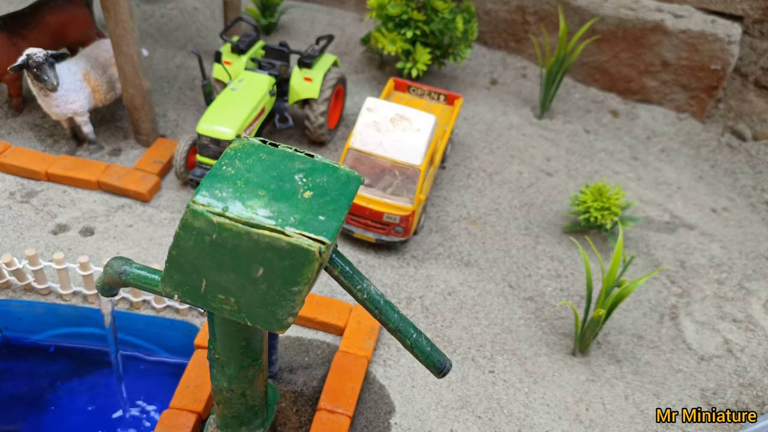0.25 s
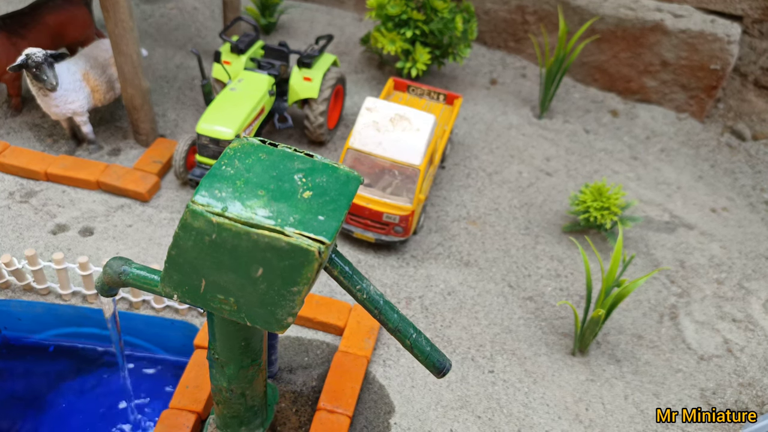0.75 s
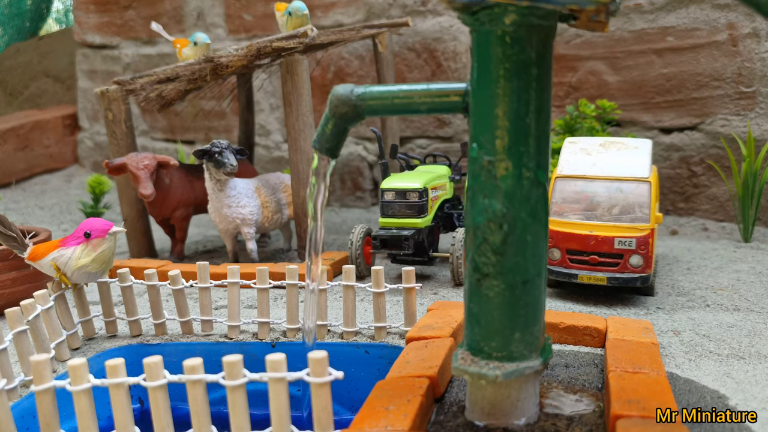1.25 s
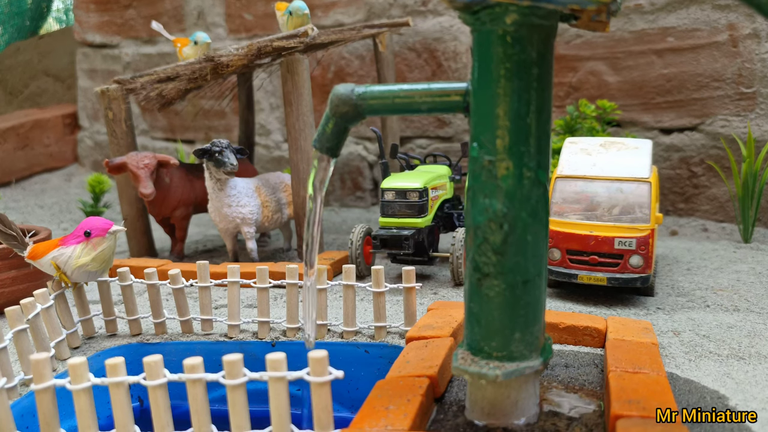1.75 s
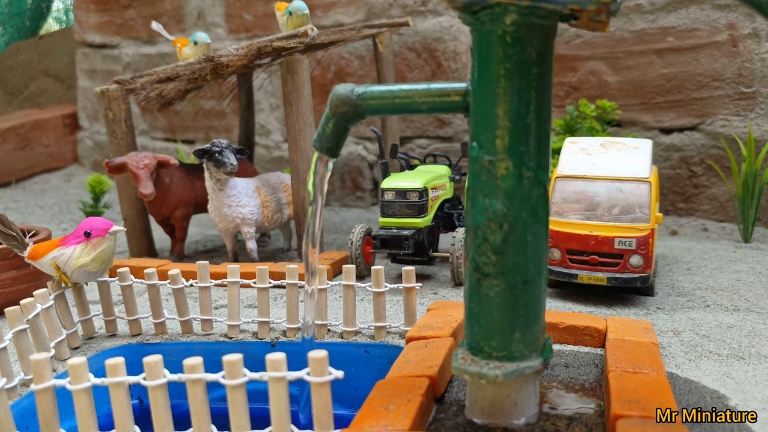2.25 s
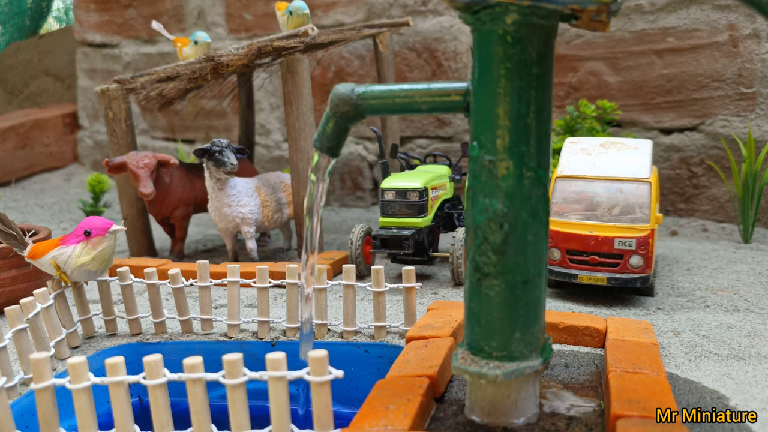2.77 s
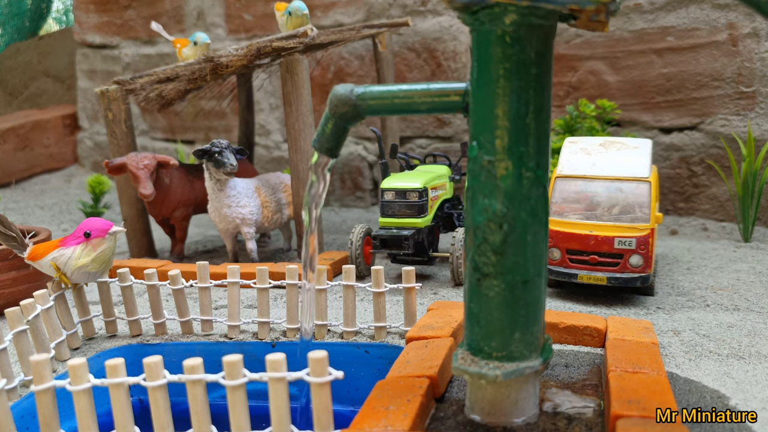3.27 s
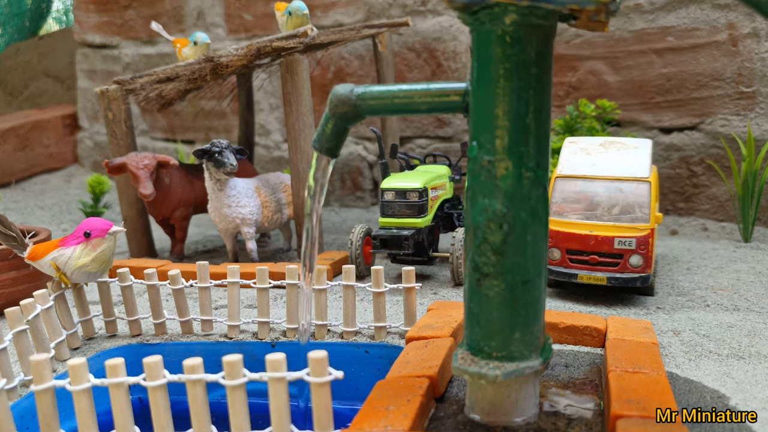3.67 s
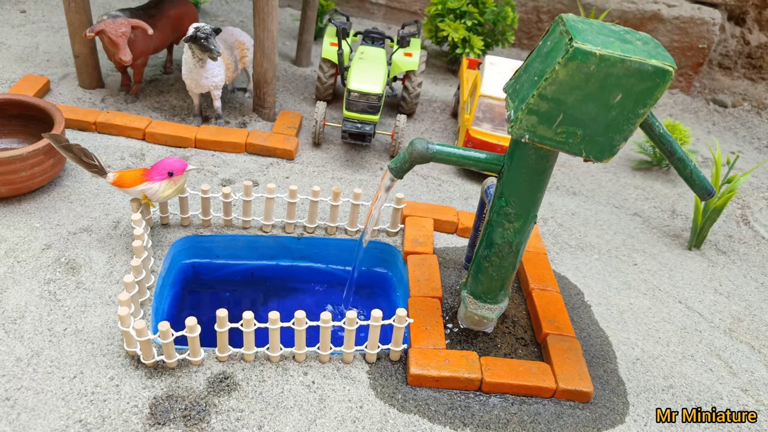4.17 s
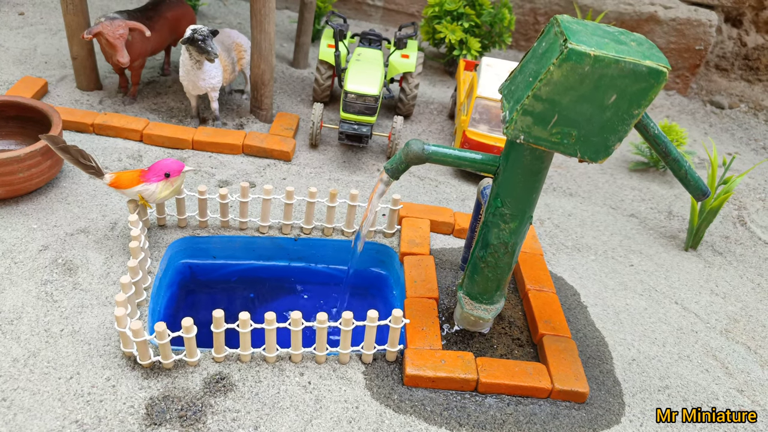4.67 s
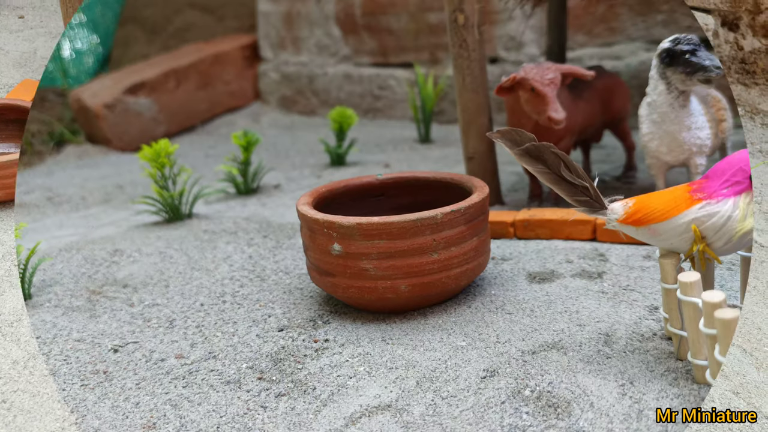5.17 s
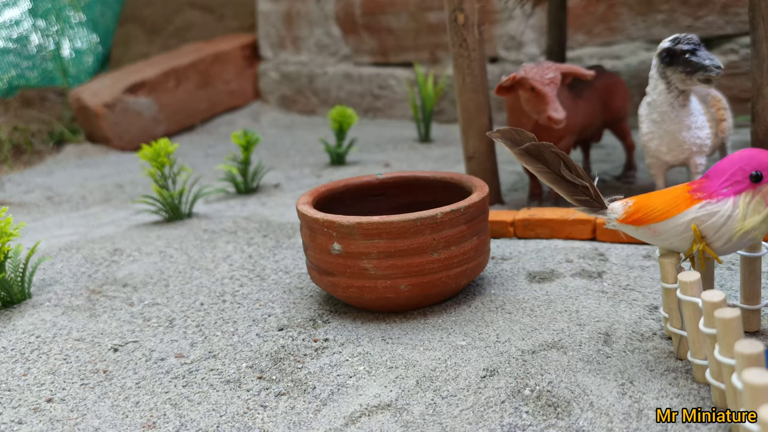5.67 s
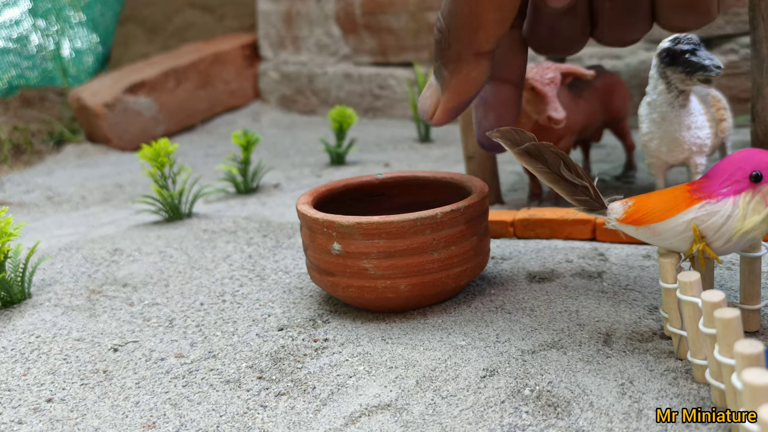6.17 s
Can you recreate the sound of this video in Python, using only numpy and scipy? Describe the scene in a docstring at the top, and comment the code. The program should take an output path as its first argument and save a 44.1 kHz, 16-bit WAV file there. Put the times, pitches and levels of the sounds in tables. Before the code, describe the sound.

From 0 to about 6.4 seconds a thin stream of water runs continuously into a small plastic tub, close to a phone microphone outdoors. It is a light, bright, uneven trickle: many short slaps of a cycle or two, mostly mid-pitched, mixed with tiny bubbles that often chirp upward, plinks, ticks and fine fizz. Stronger plips stand out near 0.5, 1.2 to 1.5, 1.8, 2.2, 3.5, 4.3 and 4.6 seconds; momentary lulls fall near 1.0, 2.2, 3.1, 4.5, 4.9 and 6.3. The tub adds very short, scattered reflections, with hardly any tail from the open yard. Far away a high, rasping insect chirps about four times a second, very faint, with slightly wider gaps around 5 seconds. Beneath lie quiet air and low, lumpy rumble, swelling faintly near 0.2, 1.25, 2.1, 2.75 and 5.75 seconds, with soft bumps near 0.1 and 2.6.

```python
"""Thin stream into a plastic tub, outdoors

A thin stream from a toy pump falls into a small plastic tub of water, close to a phone.
Dents in the surface close with a slap, damped rings of a cycle or two; trapped air rings as bubbles,
most rising in pitch. Clumped tiny rings and shaped noise fill the gaps. An insect, perhaps a cricket,
chirps far off as gated noise, over quiet air and a low lumpy noise rumble with a few soft bumps."""
import sys
import numpy as np
from scipy import signal
from scipy.io import wavfile

SR = 44100
rng = np.random.default_rng(int(sys.argv[2]) if len(sys.argv) > 2 else 0)


def int16_out(signal):
    """Quantize to a 16-bit WAV file."""
    q = np.round(np.clip(np.atleast_2d(signal).T, -1, 1) * 32767)
    wavfile.write(sys.argv[1], SR, q.astype(np.int16))


N = 283077
TIME = np.arange(N) / SR
LEAD_SAMPLES = 200  # part of each ring ahead of its nominal time, where it swells

# dents in the surface, snapping shut: [t/s, relative level/dB, f/Hz, swell/cycles]
SLAPS = [(0.026, -13.5, 610, 0.041), (0.0445, -10.5, 870, 0.1), (0.126, -21.5, 365.0, 0.083),
         (0.1599, -16.5, 930, 0.014), (0.2349, -15, 920, 0.013), (0.2616, -19, 382, 0.061),
         (0.267, -11, 2570, 1.5), (0.3491, -20, 675, 0.037), (0.3704, -20, 3700, 0.14),
         (0.3858, -8, 805, 0.11), (0.4122, -13.5, 1670, 0.38), (0.4167, -14.5, 1220, 0.095),
         (0.483, -16, 1530.0, 0.024), (0.502, -2.5, 1210, 0.065), (0.5163, -28, 590.0, 0.046),
         (0.5584, -17.5, 980, 0.041), (0.6151, -9.5, 1730, 0.063), (0.6363, -10.5, 710, 0.023),
         (0.6464, -24, 1600.0, 0.041), (0.665, -23, 1910.0, 0.056), (0.6693, -12.5, 2190, 0.095),
         (0.6997, -13, 2200, 0.066), (0.727, -13.5, 770, 0.082), (0.8045, -16.5, 785, 0.02),
         (0.808, -20.5, 1350.0, 0.033), (0.8388, -12.5, 1270, 0.01), (0.8867, -25.5, 740, 0.1),
         (0.9191, -15, 880, 0.011), (1.0973, -11.5, 3040, 0.046), (1.1069, -18, 1410.0, 0.041),
         (1.13, -12.5, 740, 0.034), (1.1506, -6, 980, 0.071), (1.165, -17, 1800.0, 0.034),
         (1.2103, -20.5, 3900, 0.041), (1.245, -10, 714, 0.081), (1.2697, -16, 757.0, 0.12),
         (1.2828, -6, 1770, 0.38), (1.305, -16, 1640.0, 0.022), (1.361, -6, 880, 0.046),
         (1.369, -27, 1770.0, 0.23), (1.4207, -11.5, 1190, 0.11), (1.4385, -21, 784.0, 0.051),
         (1.4774, -12.5, 890, 0.069), (1.5006, -5.5, 1760.0, 0.049), (1.5031, -16, 1300, 0.041),
         (1.5114, -7.5, 3150, 0.18), (1.5357, -11, 1260, 0.042), (1.5575, -14.5, 2690, 3.2),
         (1.5726, -19.5, 1430.0, 0.046), (1.5863, -17.5, 704, 0.086), (1.6212, -21, 2080, 0.02),
         (1.697, -16, 750, 0.045), (1.7285, -22, 1820.0, 0.041), (1.7777, -5, 1420, 0.085),
         (1.8196, -30, 2740.0, 0.29), (1.8685, -15.5, 2420.0, 0.027), (1.876, -6.5, 814.0, 0.11),
         (1.8913, -27, 2660.0, 0.04), (1.8952, -12, 863.0, 0.034), (1.9225, -18.5, 980, 0.032),
         (1.9563, -16, 870, 0.029), (1.9948, -9, 3460, 0.19), (2.0152, -11.0, 574, 0.058),
         (2.023, -13.5, 1920, 0.44), (2.0961, -22.5, 940, 0.27), (2.158, -3.5, 2500, 0.51),
         (2.1985, -13, 2090.0, 0.05), (2.3041, -19.5, 1540.0, 0.057), (2.344, -6, 1890.0, 0.78),
         (2.3729, -19, 608.0, 0.061), (2.46, -14, 2740, 0.3), (2.461, -16, 504, 0.13),
         (2.4649, -16, 3610.0, 0.13), (2.572, -15, 3730, 0.055), (2.5962, -6.0, 584, 0.041),
         (2.6536, -27, 739.0, 0.041), (2.675, -21.5, 385, 0.15), (2.6868, -26, 365.0, 0.099),
         (2.7372, -13.5, 680, 0.048), (2.8311, -9, 980, 0.062), (2.9054, -18.5, 730, 0.041),
         (2.925, -7, 3160, 0.89), (2.942, -7.5, 655, 0.053), (2.9915, -18.5, 1010.0, 0.024),
         (3.0252, -7, 1690, 0.015), (3.0321, -15, 848.0, 0.06), (3.1322, -24.5, 448.0, 0.041),
         (3.1594, -26, 1500.0, 0.036), (3.1756, -18.5, 380, 0.053), (3.196, -9, 1140, 0.03),
         (3.2088, -26, 402.0, 0.056), (3.2269, -9.5, 1810, 0.028), (3.2787, -19.5, 520, 0.11),
         (3.2866, -23, 536.0, 0.041), (3.3273, -17, 1670, 0.033), (3.3391, -12, 1460, 0.33),
         (3.3508, -17, 1800, 1.1), (3.3703, -10, 1370, 0.074), (3.4516, -25, 902.0, 0.041),
         (3.483, -11.5, 754, 0.037), (3.5217, -5, 1590, 0.27), (3.5473, -11, 3300, 0.51),
         (3.5865, -23, 1310.0, 0.038), (3.6433, -22.5, 1030.0, 0.095), (3.7201, -12.5, 990, 0.012),
         (3.731, -22, 572.0, 0.041), (3.754, -7.5, 550, 0.035), (3.7794, -22, 1550.0, 0.078),
         (3.7883, -22, 1500.0, 0.037), (3.8008, -15, 1020, 0.026), (3.8324, -19, 1200.0, 0.043),
         (3.845, -12, 810, 0.29), (3.8557, -19, 1630, 0.041), (3.871, -6.5, 2900, 0.042),
         (3.9025, -6.5, 2960, 0.062), (3.9538, -11.5, 2270, 0.083), (3.9825, -15, 605, 0.041),
         (4.0843, -17, 1270, 0.041), (4.16, -17, 546.0, 0.035), (4.1906, -22, 1850.0, 0.045),
         (4.213, -9, 900, 0.041), (4.2363, -20, 968.0, 0.042), (4.2435, -14.5, 1300, 0.037),
         (4.2686, -11.5, 1450, 0.034), (4.2926, -4, 2430, 0.33), (4.3066, -16, 1870.0, 0.041),
         (4.3276, -9.5, 573, 0.041), (4.3548, -21, 2570.0, 0.11), (4.364, -25, 1370.0, 0.041),
         (4.3775, -16.5, 662.0, 0.09), (4.447, -11, 1130, 0.019), (4.5421, -14.5, 1370, 0.07),
         (4.5646, -3.5, 1120, 0.035), (4.5992, -5, 2460, 2.4), (4.7368, -25, 768.0, 0.053),
         (4.7661, -10, 845, 0.036), (4.7744, -19, 1560.0, 0.18), (4.829, -10.5, 830, 0.031),
         (4.8632, -16.5, 1100, 0.024), (5.008, -23.5, 977.0, 0.041), (5.0554, -15.5, 696, 0.055),
         (5.0712, -18.5, 2450.0, 0.72), (5.0911, -13, 1700, 0.05), (5.1018, -8.5, 2700, 0.045),
         (5.1185, -13, 734, 0.041), (5.1293, -8.5, 1700, 0.13), (5.149, -10, 1710, 0.11),
         (5.1969, -18.5, 1070, 0.017), (5.225, -8.5, 3350, 0.3), (5.2343, -15.5, 1810, 0.063),
         (5.2515, -19.5, 481.0, 0.055), (5.3319, -9, 2880, 2.2), (5.3498, -12.5, 1040, 0.014),
         (5.3876, -30, 1840.0, 0.037), (5.417, -20.5, 1540, 0.029), (5.4482, -16.0, 1210, 0.076),
         (5.468, -21, 1290.0, 0.11), (5.506, -18, 2210, 0.036), (5.561, -15.5, 613, 0.027),
         (5.5921, -20, 596, 0.085), (5.614, -11, 3140, 0.069), (5.6217, -14, 1160.0, 0.041),
         (5.6404, -24, 771.0, 0.076), (5.7165, -16.5, 780, 0.13), (5.723, -18.5, 660, 0.051),
         (5.735, -29, 1330, 0.1), (5.8084, -11.5, 670, 0.015), (5.8328, -14.5, 665, 0.19),
         (5.8378, -27, 2060.0, 0.042), (5.864, -19.5, 694, 0.036), (5.8977, -18.5, 1880, 0.037),
         (5.979, -20, 1700.0, 0.13), (5.9833, -18.5, 1400, 0.042), (5.987, -14, 860, 0.028),
         (6.0443, -15, 530, 0.027), (6.0884, -17, 1670, 0.043), (6.095, -23, 2110, 0.2),
         (6.1175, -7.5, 2950, 0.097), (6.1452, -7, 695, 0.29), (6.191, -21.5, 806.0, 0.047),
         (6.2436, -20, 1340, 0.022), (6.361, -20.5, 4100.0, 0.048), (6.364, -12, 1610, 0.81),
         (6.385, -10.5, 700, 0.04)]
# air bubbles: [t/s, relative level/dB, starting f/Hz, swell/cycles, t60/s, climb/(share of f per s)]
BUBBLES = [(0.0034, -19, 1230, 0.2, 0.003, 0), (0.0039, -21.5, 6450, 0.07, 0.0012, 167),
           (0.014, -18.5, 3120, 0.11, 0.0011, 250), (0.0355, -28, 1890, 0.05, 0.011, 158),
           (0.08, -10.5, 4500, 0.24, 0.002, 2), (0.103, -10.5, 5950, 1.2, 0.00095, 0),
           (0.126, -11, 6800, 1.1, 0.0033, -5), (0.157, -33.5, 2290, 2, 0.023, 194),
           (0.22, -31, 1690, 0.84, 0.013, 31), (0.2695, -31.5, 3790.0, 0.041, 0.013, 51),
           (0.295, -19, 2670, 0.041, 0.00097, 250), (0.3015, -21, 5700, 0.29, 0.0032, 106),
           (0.3076, -27, 7060, 0.052, 0.0027, 245), (0.3191, -20, 3130, 0.1, 0.0047, 3),
           (0.33, -26, 5580.0, 0.11, 0.0049, 55), (0.3553, -30, 3230.0, 0.053, 0.0027, 7),
           (0.3897, -19.5, 1420, 2.1, 0.013, 179), (0.4083, -22, 2400.0, 0.36, 0.0028, 252),
           (0.536, -24.5, 3420.0, 0.042, 0.0031, 4), (0.6, -23, 946.0, 0.38, 0.0091, 235),
           (0.6003, -14, 5300, 0.44, 0.0019, 253), (0.6158, -25, 6800, 0.059, 0.0034, 75),
           (0.759, -26, 5380.0, 0.41, 0.0033, -19), (0.8218, -38, 1770, 2.2, 0.012, 240),
           (0.8675, -26.5, 3240, 2, 0.002, 0), (0.8756, -19, 5800, 0.052, 0.0013, 229),
           (0.9007, -22, 4480, 0.042, 0.002, 238), (0.9354, -30, 7100, 3, 0.0045, 50),
           (0.9805, -37, 3440, 0.5, 0.0071, 200), (1.0042, -31.5, 1410, 0.091, 0.007, 240),
           (1.0675, -20.0, 1426, 0.049, 0.018, 237), (1.2142, -33, 5150, 0.2, 0.0052, 200),
           (1.2556, -29, 6200, 0.042, 0.0054, 45), (1.3038, -14.5, 2920, 0.4, 0.0013, 254),
           (1.3552, -28, 4540, 0.08, 0.0044, 41), (1.395, -30, 1670, 0.23, 0.012, 63),
           (1.3965, -20.5, 7360, 0.38, 0.00081, 21), (1.4302, -18, 2440.0, 0.29, 0.0045, 261),
           (1.4587, -21, 3450, 0.14, 0.0054, 244), (1.5357, -15.5, 1210, 0.81, 0.0093, 61),
           (1.6002, -24.5, 835, 0.1, 0.024, 103), (1.6155, -31, 2190, 2, 0.004, 242),
           (1.6336, -31.5, 3680, 0.4, 0.004, 120), (1.655, -34, 3760, 2, 0.002, 120),
           (1.7207, -28, 3800, 0.17, 0.0028, 242), (1.724, -34.5, 5550, 1, 0.014, 69),
           (1.7498, -12.5, 1620, 0.22, 0.011, 145), (1.818, -36, 2280, 0.5, 0.022, 100),
           (1.9007, -31, 2050, 0.041, 0.014, 80), (1.9762, -24.5, 2820, 0.078, 0.0079, 127),
           (2.0426, -25.5, 1470, 1.6, 0.011, 139), (2.056, -30, 1540.0, 0.23, 0.01, 263),
           (2.1373, -23, 2750, 0.041, 0.0044, 131), (2.139, -19.5, 5470, 0.048, 0.0044, 208),
           (2.1543, -33, 2950, 0.3, 0.009, 180), (2.199, -22.5, 5970, 0.22, 0.0037, 52),
           (2.2266, -17, 7400, 0.76, 0.00055, 252), (2.2526, -22, 5190, 1.7, 0.0012, 120),
           (2.2736, -7, 4570, 0.28, 0.00097, 213), (2.301, -31, 7460, 1.4, 0.0031, 27),
           (2.3313, -14.0, 1340, 0.042, 0.01, 251), (2.3387, -14, 810, 0.053, 0.0096, 260),
           (2.345, -16.5, 3230, 2.9, 0.0047, 144), (2.3655, -7.5, 4270, 0.041, 0.00058, 235),
           (2.4237, -35, 2960, 0.5, 0.0087, 202), (2.427, -13.5, 4770, 0.041, 0.00093, 240),
           (2.436, -35, 3940, 0.59, 0.0051, 56), (2.4688, -37, 2030, 0.3, 0.007, 52),
           (2.5374, -34, 3250, 0.041, 0.024, 69), (2.541, -12, 3320, 0.076, 0.0014, 66),
           (2.543, -24.5, 5700, 0.046, 0.0052, 59), (2.6127, -40, 1940, 2, 0.017, 122),
           (2.619, -22.5, 3170, 0.64, 0.018, 136), (2.6974, -35, 1150, 0.11, 0.046, 54),
           (2.6973, -29.5, 3340, 0.042, 0.0081, 190), (2.7154, -24.5, 3720, 0.18, 0.0016, 242),
           (2.7673, -33.5, 3080, 1, 0.0095, 104), (2.8876, -28.5, 5930, 0.59, 0.003, 200),
           (2.92, -20.5, 3160, 0.043, 0.011, 93), (2.9687, -20.5, 5150, 0.31, 0.0051, 159),
           (2.9824, -33, 7600, 2, 0.0037, 0), (3.0114, -31, 2960, 0.057, 0.0059, 101),
           (3.0398, -25, 2260, 0.041, 0.004, 246), (3.0878, -16, 3550.0, 0.047, 0.00081, 249),
           (3.09, -25, 5700, 0.049, 0.01, 254), (3.1086, -34, 1860, 0.3, 0.011, 122),
           (3.1108, -32, 2570, 0.041, 0.011, 179), (3.1374, -36, 2670, 2, 0.014, 50),
           (3.2312, -20.5, 770, 0.038, 0.0089, 262), (3.249, -24, 1026, 0.041, 0.045, 105),
           (3.2569, -21, 3320, 0.29, 0.005, 258), (3.2684, -20, 4530, 0.11, 0.0017, 71),
           (3.3212, -23.5, 5260.0, 0.63, 0.0051, 18), (3.3423, -26, 4400, 0.043, 0.0038, 210),
           (3.3839, -30, 1060, 0.041, 0.015, 128), (3.3871, -19.5, 2820, 0.33, 0.0064, 232),
           (3.4043, -34, 1280, 2.4, 0.016, 183), (3.432, -23, 3380, 0.13, 0.0028, 22),
           (3.4624, -23, 2950, 0.045, 0.003, 90), (3.4777, -36, 7640, 0.3, 0.0054, 3),
           (3.523, -16, 1180, 1, 0.012, 24), (3.5426, -25.0, 2740, 0.043, 0.0034, 240),
           (3.6753, -37, 4520, 0.3, 0.0099, 50), (3.737, -26.5, 3260, 0.041, 0.0054, 207),
           (3.7394, -30, 6650, 0.049, 0.0028, 118), (3.7906, -21.5, 5960, 0.1, 0.0027, 248),
           (3.8287, -16, 7900, 0.11, 0.0018, 4), (3.8433, -27.5, 3270, 2.2, 0.0076, 154),
           (3.8462, -26.5, 4290.0, 0.17, 0.0065, 254), (3.8754, -22, 5450.0, 1, 0.0016, 47),
           (3.899, -18, 5200, 0.53, 0.0039, 139), (3.9321, -39, 1680, 2, 0.012, 52),
           (3.953, -19.5, 7050, 1.2, 0.0014, 8), (3.9584, -11, 1050.0, 0.041, 0.0011, 6),
           (3.977, -33, 3250, 0.092, 0.0087, 83), (3.988, -21.5, 1750, 0.097, 0.015, 265),
           (4.066, -13, 2300, 0.041, 0.002, 254), (4.0717, -9, 4250, 0.67, 0.001, 0),
           (4.0799, -12, 6730, 0.058, 0.00073, 230), (4.1374, -27.5, 6130, 2, 0.0017, 2),
           (4.161, -25, 6870, 0.31, 0.00093, 6), (4.1894, -14, 1670, 0.06, 0.0075, 100),
           (4.1909, -16, 2700, 0.34, 0.008, 155), (4.21, -28.5, 3390.0, 0.24, 0.015, -6),
           (4.2346, -30, 2080, 0.3, 0.007, 0), (4.2634, -28, 1770, 2.2, 0.022, 48),
           (4.2922, -17, 3170, 0.11, 0.01, 117), (4.303, -25, 6060.0, 0.047, 0.0014, 57),
           (4.3134, -27, 4060, 0.097, 0.004, -1), (4.3348, -35, 2630, 0.1, 0.011, 191),
           (4.3583, -5, 4330, 0.2, 0.0009, -14), (4.4094, -29, 4550, 2, 0.0018, 240),
           (4.4192, -31.5, 756, 0.041, 0.022, 233), (4.477, -15.5, 4100, 0.1, 0.0083, -13),
           (4.496, -21, 5500, 0.043, 0.002, -3), (4.565, -21.5, 7440, 0.058, 0.0034, 22),
           (4.5737, -27, 3030, 0.061, 0.0036, -1), (4.5994, -16.5, 2820, 0.042, 0.011, 76),
           (4.6153, -29, 2420, 2, 0.016, 200), (4.6177, -14, 3980.0, 0.1, 0.0011, 0),
           (4.662, -28, 1800, 0.18, 0.011, 240), (4.6658, -11.5, 4100, 0.059, 0.0016, 0),
           (4.6876, -5, 4450, 0.39, 0.0012, 3), (4.7161, -18.5, 2980, 0.057, 0.0037, 62),
           (4.7741, -18, 3790, 0.74, 0.0048, 109), (4.803, -13, 745, 0.1, 0.004, 84),
           (4.809, -20.5, 975, 0.13, 0.0052, 240), (4.8094, -26.5, 6050.0, 0.047, 0.0031, 126),
           (4.8383, -22.5, 2910, 0.044, 0.013, 134), (4.9315, -12.5, 4160, 2.5, 0.0019, 168),
           (4.9548, -34, 3200, 0.13, 0.012, 99), (4.99, -19.5, 5470, 0.4, 0.00097, 43),
           (5.0267, -20.5, 3520, 0.074, 0.0053, 0), (5.092, -22.5, 7250, 0.042, 0.0038, 6),
           (5.1024, -15.5, 6760, 1.2, 0.0019, 37), (5.1607, -21, 3520, 0.041, 0.0054, 252),
           (5.1792, -35, 1330.0, 0.044, 0.012, 106), (5.2292, -28, 3190.0, 0.042, 0.0078, 120),
           (5.2514, -23.5, 4050, 0.13, 0.0034, -8), (5.2646, -32.5, 1350, 0.041, 0.011, 39),
           (5.282, -31, 5300, 0.21, 0.0061, 211), (5.2935, -24, 4800, 0.067, 0.0017, 247),
           (5.3763, -17.5, 686, 0.03, 0.0023, -6), (5.4047, -19, 5000, 0.28, 0.0049, 114),
           (5.4104, -15, 6070, 0.22, 0.0011, 0), (5.4712, -25.5, 1070, 0.041, 0.013, 93),
           (5.4995, -22, 4940, 0.048, 0.0024, 65), (5.5416, -17, 7400, 0.55, 0.00069, 47),
           (5.5478, -22.5, 2230, 0.041, 0.0043, 253), (5.5772, -34, 404, 0.2, 0.015, 0),
           (5.6008, -34, 1600.0, 1.3, 0.016, 28), (5.6014, -22.5, 6000, 0.67, 0.0042, 0),
           (5.6697, -20, 4200, 0.044, 0.0013, 1), (5.7156, -18, 2620, 0.12, 0.0027, 248),
           (5.7443, -43, 2020, 0.037, 0.067, 119), (5.7717, -8, 7900, 0.048, 0.00048, 213),
           (5.7824, -9.5, 5040, 0.35, 0.0008, 1), (5.806, -40, 1620, 0.28, 0.016, 50),
           (5.8513, -22, 3370, 0.099, 0.0073, -1), (5.8645, -29, 6700, 0.083, 0.0038, 141),
           (5.87, -30.0, 2650, 0.093, 0.005, 1), (5.9047, -21.5, 4070, 1.1, 0.0018, 7),
           (5.922, -26.5, 7800, 0.31, 0.0018, 9), (6.0004, -20, 4560.0, 0.044, 0.0036, 93),
           (6.0116, -21, 2380, 0.17, 0.0018, 0), (6.0123, -25.5, 7600, 0.054, 0.0032, 37),
           (6.0179, -18, 2800, 0.097, 0.0033, 0), (6.07, -27, 1760.0, 3.2, 0.0012, 250),
           (6.0885, -19.5, 6570, 0.062, 0.0019, 10), (6.1203, -20, 2410, 3.6, 0.0071, 239),
           (6.1212, -20, 4060, 0.28, 0.0086, 252), (6.129, -19, 4400, 0.041, 0.0034, 0),
           (6.1719, -37, 2900, 0.15, 0.0016, 89), (6.1726, -9.5, 2700, 0.066, 0.0024, 248),
           (6.176, -29, 3220, 2, 0.0018, 0), (6.2117, -20.5, 4180.0, 0.043, 0.00085, -5),
           (6.238, -32.5, 5360, 0.042, 0.009, 166), (6.2502, -19.5, 3330, 0.51, 0.0013, 0),
           (6.303, -10, 4520, 0.5, 0.0032, 44), (6.334, -26.5, 8050, 0.21, 0.0028, 28),
           (6.396, -23, 4840.0, 0.042, 0.0026, 254)]
# small sloshing under the stream: [t/s, relative level/dB]
SLOSH = [(0, -35.5), (.2, -58), (.45, -47.5), (.85, -49.5), (1.25, -48), (1.65, -52), (2.0, -46.5),
         (2.7, -47.5), (3.25, -47), (3.6, -50), (4.3, -50), (4.75, -48.5), (5.15, -49), (5.6, -52),
         (6.2, -45)]


def gain_of(db):
    """Decibels to a gain."""
    return 10 ** (np.asarray(db) / 20)


def evened(x):
    """Scales to rms 1."""
    return x / np.sqrt(np.mean(x ** 2) + 1e-20)


def curve_db(points):
    """Level over time, linear between (t/s, level/dB) points."""
    return np.interp(TIME, *np.transpose(points))


def read(points, hz):
    """Reads a spectrum on a log-frequency axis."""
    f, value = np.transpose(points)
    return np.interp(np.log(hz + 1), np.log(f + 1), value)


def add(mix, s, sound):
    """Mixes a ring in with its nominal time at s; its lead-in starts no earlier than the scene."""
    start = max(round(s * SR) - LEAD_SAMPLES, 0)
    part = mix[start:][:len(sound)]
    part += sound[:len(part)]


def coloured(x, points, size=4096):
    """Causal minimum-phase filter with the given spectrum."""
    hz = abs(np.fft.fftfreq(size, 1 / SR))
    log_gain = np.log(gain_of(read(points, hz)))
    spectrum = np.exp(np.conj(signal.hilbert(log_gain)))
    taps = np.fft.ifft(spectrum).real[:size // 2]
    return signal.oaconvolve(x, taps)[:N]


def noise(points, likeness):
    """Two channels of shaped noise with the given correlation."""
    a, b = rng.standard_normal((2, N))
    mixed = likeness * a + np.sqrt(1 - likeness ** 2) * b
    return evened(np.array([coloured(a, points), coloured(mixed, points)]))


def ring(db, hz, t60_s, rise_per_s, attack_cycles, kick_rad):
    """An air pocket swells into ringing and dies away; its pitch climbs as it nears the surface."""
    round_share, round_cycles = 0.25, 0.45  # part that wells up roundly before the pocket shuts
    t = np.arange(-LEAD_SAMPLES, int(1.2 * t60_s * SR) + 16) / SR
    sharp_swell = np.tanh(t * hz / attack_cycles)
    round_swell = np.tanh(t * hz / round_cycles)
    swell = (1 + (1 - round_share) * sharp_swell + round_share * round_swell) / 2
    envelope = swell * gain_of(db - 60 * np.maximum(t, 0) / t60_s)
    return envelope * np.sin(2 * np.pi * hz * (t + rise_per_s * t * t / 2) + kick_rad)


def stirring():
    """Gain of the fine splashing: the wobbling stream hushes it before each hit, livens it further off."""
    hush_db, hush_lead_s, hush_width_s = -1, 0.02, 0.012
    wobble_db, wobble_s, wobble_width_s = 3, 0.11, 0.044
    shut = np.zeros(N)
    shut[[round(row[0] * SR) for row in SLAPS + BUBBLES]] = 1
    t = np.arange(-SR // 10, SR // 10 + 1) / SR  # cuts the wobble off just short of its crest
    hush = np.exp(-((t + hush_lead_s) / hush_width_s) ** 2)
    wobble = np.exp(-((abs(t) - wobble_s) / wobble_width_s) ** 2)
    hushed = np.minimum(signal.oaconvolve(shut, hush, "same"), 1)
    lively = np.minimum(signal.oaconvolve(shut, wobble, "same"), 1)
    return gain_of(hush_db * hushed + wobble_db * lively)


def lull_db():
    """Level change of the sloshing; it drops in lulls, where the stream slides in smoothly."""
    # lulls, and one slight swell: [t/s, half length/s, level change/dB]
    dips = [(0.178, 0.015, -2), (1.001, 0.029, -9), (1.65, 0.01, -5), (2.244, 0.027, -24),
            (3.074, 0.016, -43), (3.627, 0.021, -2), (4.1, 0.048, -7), (2.11, .02, -6), (4.022, 0.017, 3),
            (4.523, 0.031, -13), (4.678, 0.03, -13), (4.949, 0.057, -15), (5.292, 0.036, -7.5),
            (5.523, .01, -24), (6.325, 0.035, -31)]
    return sum(db * np.exp(-((TIME - s) / half_s) ** 4) for s, half_s, db in dips)


def slaps():
    """Open dents in the surface ring for barely a cycle or two; smaller, higher ones die sooner."""
    mid_t60_s, mid_hz, shortening_power = 0.0026, 890, 0.89
    out = np.zeros(N)
    for s, db, hz, swell_cycles in SLAPS:
        t60_s = mid_t60_s * (mid_hz / hz) ** shortening_power
        add(out, s, ring(db, hz, t60_s, 0, swell_cycles, kick_rad=0.82))
    return out


def droplets(top_db, low_hz, high_hz, mid_t60_s, mean_climb_hz_per_s, count, attack_cycles=0.26):
    """The stream breaks into beads at a loose, even pace; each leaves one faint ring."""
    spread_db = 7
    out = np.zeros(N)
    for k, (when, size, weakness, life, climb) in enumerate(rng.random((count, 5))):
        hz = low_hz * (high_hz / low_hz) ** size
        db = top_db - spread_db * weakness
        t60_s = mid_t60_s * 2 ** (2 * life - 1)
        rise_per_s = 2 * climb * mean_climb_hz_per_s / hz
        sound = ring(db, hz, t60_s, rise_per_s, attack_cycles, kick_rad=0.28)
        add(out, (k + when) / count * N / SR, sound)
    return out


def bubbles():
    """Closed bubbles ring, most chirping upward; some pinch off sharply, others swell in roundly."""
    out = np.zeros(N)
    for s, db, hz, swell_cycles, t60_s, rise_per_s in BUBBLES:
        add(out, s, ring(db, hz, t60_s, rise_per_s, swell_cycles, kick_rad=0.33))
    return out


def hollow(x, level_db=-12, hz=460, width_hz=310, wander=0.45, wander_s=0.04):
    """Slaps ring the hollow that the stream digs: a resonator whose pitch wanders with its size."""
    knots = rng.uniform(-1, 1, 1024)
    pitch_hz = hz * (1 + wander * np.interp(TIME / wander_s, np.arange(len(knots)), knots))
    turn = np.exp(2j * np.pi * np.cumsum(pitch_hz) / SR)
    r = np.exp(-np.pi * width_hz / SR)
    # shift the pitch to 0 Hz, low-pass, shift back
    slow = signal.lfilter([1 - r], [1, -r], x / turn + 1e-18)
    return gain_of(level_db) * 2 * (turn * slow).imag


def splashing(curve, level_db, low_hz, high_hz, cycles, max_rise_per_s, attack_cycles, count):
    """Many tiny air pockets of random size ring; their level clumps as the stream wobbles."""
    spread_db, clump_db, clump_s = 9, 5, 0.025
    out = np.zeros(N)
    for when, size, strength, life, climb in rng.random((count, 5)):
        hz = low_hz * (high_hz / low_hz) ** size
        t60_s = cycles * 2 ** (2 * life - 1) / hz
        db = spread_db * strength ** 2
        sound = ring(db, hz, t60_s, max_rise_per_s * climb, attack_cycles, kick_rad=0.62)
        add(out, when * N / SR, sound)
    knots_s = np.arange(0, N / SR, clump_s)
    clumps = gain_of(clump_db * np.interp(TIME, knots_s, rng.uniform(-1, 1, len(knots_s))))
    return gain_of(curve_db(curve) + level_db) * evened(out * clumps)


def gurgle(murmur_db=-11.0):
    """The hollow that the stream digs murmurs faintly, as shaped noise, and gives off soft, round plops."""
    # murmur spectrum: [f/Hz, level/dB]
    murmur_colour = [(150, -63), (280, 4.5), (380, 0.5), (470, -4), (560, -28), (700, -22.5), (1500, -11),
                     (2500, -37.5)]
    murmur = evened(coloured(rng.standard_normal(N), murmur_colour))
    plops = splashing(SLOSH, level_db=-10.5, low_hz=329, high_hz=494, cycles=4,
                      max_rise_per_s=8.0, attack_cycles=0.8, count=220)
    return gain_of(curve_db(SLOSH) + murmur_db) * murmur + plops


def spray(x, colour, level_db, linger_s, follow):
    """Hits throw up hissing droplets: shaped noise that follows their smoothed level to a power."""
    keep = np.exp(-1 / (linger_s * SR))
    power = signal.lfilter([1 - keep], [1, -keep], x ** 2) + 1e-14
    hiss = coloured(rng.standard_normal(N), colour)
    return gain_of(level_db) * evened(power ** (follow / 2) * hiss)


def rim(x):
    """Steady early echoes off the tub rim and the pump, at both ports."""
    # first echoes: [delay/s, gain at the left port, gain at the right port]
    echoes = [(.00087, -.08, -.06), (.0012, .1, 0), (.00132, -.1, -.03), (.00153, 0, -.07), (.00227, .1, 0),
              (.00247, .12, 0), (.00264, .06, .03)]
    return sum(np.outer(gains, np.pad(x, (round(s * SR), 0))[:N]) for s, *gains in echoes)


def tub(x, wall_db=-9.5, t60_s=0.018, first_s=0.00072, size=1024):
    """Tub walls and nearby things throw back a quick, decaying scatter of echoes, different at each port."""
    t = np.arange(size) / SR
    fade_in = np.clip((t - first_s) / first_s, 0, 1)
    taps = rng.standard_normal((3, 2, size)) * gain_of(-60 * t / t60_s) * fade_in
    taps /= np.linalg.norm(taps, axis=2, keepdims=True)
    out = np.zeros((2, N))
    # the splash point wanders, so the echo pattern keeps changing
    for k, scatter in enumerate(taps):
        share = np.cos(2 * np.pi * (2.3 * TIME + k / 3)) * np.sqrt(2 / 3)
        out += signal.oaconvolve((x * share)[None], scatter, axes=1)[:, :N]
    return gain_of(wall_db) * out


def yard(x, wet_db=-31):
    """Weak diffuse tail from the open yard: noise decaying at a rate set by frequency."""
    # decay: [f/Hz, t60/s]
    decay = [(200, 0.99), (450, 0.48), (1500, 0.21), (4000, 0.34), (9000, 0.03)]
    hz, t, z = signal.stft(rng.standard_normal((2, SR // 2)), SR, nperseg=256)
    fading = z * gain_of(-60 * t / read(decay, hz)[:, None])
    tail = signal.istft(fading, SR, nperseg=256)[1]
    return gain_of(wet_db) * signal.oaconvolve(x[None], tail / np.linalg.norm(tail[0]), axes=1)[:, :N]


def water(radiate_hz=320, left_lag_samples=10, lull_fizz_share=0.4):
    """The whole splash; so small a source radiates little bass, and it reaches the right port first."""
    # fizz of tiny bubbles: [t/s, relative level/dB]
    fizz_curve = [(0, -60), (.4, -52.5), (.65, -62), (1.2, -56), (1.8, -52), (2.1, -54.5), (2.7, -57),
                  (3.4, -55.5), (4.1, -61), (4.3, -52), (4.9, -61.5), (5.3, -54), (5.7, -67.5),
                  (6.42, -50.5)]
    # mist after a hit: [f/Hz, level/dB]
    mist_colour = [(300, -4), (500, 8), (1500, -29), (2200, 19), (3300, 9), (4200, -6), (5000, -30),
                   (6300, -37), (8500, 18), (10000, -15), (16000, -43)]
    # bright spatter at the moment of a hit: [f/Hz, level/dB]
    spatter_colour = [(1500, 6), (4500, 10), (7500, 9), (10000, 6.5), (16000, 1)]
    # froth that a hit leaves behind: [f/Hz, level/dB]
    froth_colour = [(1200, -41), (2200, 4.5), (3500, 5), (6500, -1), (8500, -28)]
    # left port against the right: [f/Hz, level/dB]
    left_colour = [(60, 9.5), (130, -11), (250, -23.5), (400, -5.5), (600, -4.5), (800, -2), (1050, -2.5),
                   (1300, 1.5), (1700, 3.5), (2150, -3), (2650, 0), (3800, -1), (4600, -12.5), (7300, -5.5),
                   (10000, 3.5), (15000, -8)]

    stir, lull, dents = stirring(), lull_db(), slaps()
    slosh_gain = stir * gain_of(lull)
    fizz_gain = stir * gain_of(lull_fizz_share * lull)
    ticks = droplets(top_db=-38, low_hz=2400, high_hz=6150, mid_t60_s=0.004,
                     mean_climb_hz_per_s=330000, count=56, attack_cycles=1.4)
    pats = droplets(top_db=-24, low_hz=430, high_hz=1630, mid_t60_s=0.0019,
                    mean_climb_hz_per_s=13000, count=60, attack_cycles=0.17)
    plinks = droplets(top_db=-30, low_hz=1300, high_hz=2920, mid_t60_s=0.013,
                      mean_climb_hz_per_s=60000, count=30)
    hits = dents + bubbles() + fizz_gain * ticks + slosh_gain * (pats + plinks)

    x = hits + hollow(dents) + slosh_gain * gurgle()
    x += spray(hits, mist_colour, level_db=-61.0, linger_s=0.00078, follow=0.4)
    edges = np.gradient(hits)
    spatter = np.array([spray(edges, spatter_colour, level_db=-60.5, linger_s=0.00041, follow=0.7)
                        for port in range(2)])
    x += fizz_gain * spray(hits, froth_colour, level_db=-63.5, linger_s=0.002, follow=0.56)
    x += slosh_gain * splashing(SLOSH, level_db=-8.5, low_hz=583, high_hz=1920, cycles=3.0,
                                max_rise_per_s=63, attack_cycles=0.24, count=400)
    x += fizz_gain * splashing(fizz_curve, level_db=-3, low_hz=2090, high_hz=8250, cycles=19,
                               max_rise_per_s=89, attack_cycles=1.4, count=950)

    x = signal.sosfilt(signal.butter(2, radiate_hz, "high", fs=SR, output="sos"), x)
    left, right = x + rim(x) + tub(x) + yard(x) + spatter
    late_left = np.pad(left, (left_lag_samples, 0))[:N]
    return np.array([coloured(late_left, left_colour), right])


def lumps(lump_db=5, lump_s=0.05):
    """Uneven, random gain of the rumble, at rms 1."""
    knots_s = np.arange(0, N / SR, lump_s)
    heights = rng.uniform(-1.2, 1, len(knots_s))
    return evened(gain_of(lump_db * np.interp(TIME, knots_s, heights)))


def background(air_db=-64.5, rumble_db=-1, bump_swell_cycles=0.23):
    """Quiet outdoor air and a drifting rumble, both shaped noise, and soft bumps, low damped rings."""
    # soft low bumps: [t/s, relative level/dB, f/Hz, t60/s]
    bump_rows = [(0.1283, -24, 176, 0.011), (0.134, -50, 82.5, 0.58), (1.16, -50, 83.5, 0.27),
                 (2.012, -49, 97, 0.25), (2.08, -45, 143, 0.1), (2.554, -39, 98, 0.25),
                 (2.59, -38, 86, 0.22), (2.597, -28, 137, 0.064), (2.772, -56, 159.4, 0.38),
                 (2.88, -45, 166, 0.13)]
    # distant rumble: [t/s, relative level/dB]
    rumble_curve = [(0, -64), (.2, -55.5), (.35, -69), (.5, -63), (.8, -64), (1.25, -56), (1.4, -64),
                    (1.9, -66), (2.07, -54.5), (2.2, -62.5), (2.75, -52), (3.05, -63.5), (5.6, -64.5),
                    (5.75, -58), (5.95, -63), (6.42, -63)]
    # rumble spectrum: [f/Hz, level/dB]
    rumble_colour = [(20, -26), (45, -7), (70, -9.5), (100, 0.5), (130, -11), (200, -3), (400, -16.5),
                     (1000, -50)]
    # air spectrum: [f/Hz, level/dB]
    air_colour = [(100, -14), (420, 4), (600, -9), (1200, -14), (2000, -11.5), (3300, -15.5), (5000, -17),
                  (7000, -14), (8300, -5), (9000, -10), (10000, -17), (16000, -29)]
    bumps = np.zeros(N)
    for s, db, hz, t60_s in bump_rows:
        add(bumps, s, ring(db, hz, t60_s, 0.22, bump_swell_cycles, kick_rad=0))
    rumble = gain_of(curve_db(rumble_curve) + rumble_db) * noise(rumble_colour, 0.58)
    air = gain_of(air_db) * noise(air_colour, 0.13)
    return air + rumble * lumps() + bumps * gain_of([[-3], [1]])  # bumps: left, right/dB


def cricket(chirp_db=-61, half_length_s=0.033, between_gain=0.04):
    """A far, rasping chirp about four times a second: gated noise, faint between chirps."""
    # middle of each chirp: [t/s]
    middles = [.18, .455, .715, .975, 1.255, 1.52, 1.775, 2.03, 2.26, 2.52, 2.78, 3.045, 3.305, 3.56, 3.81,
               4.06, 4.33, 4.59, 4.97, 5.335, 5.565, 5.79, 6.03, 6.28]
    # chirp spectrum: [f/Hz, level/dB]
    chirp_colour = [(5000, -50), (6800, -2), (7360, 9), (7520, 5), (7680, 19), (7850, 10), (8100, 9),
                    (8900, 10), (9600, -10), (11000, -60)]
    chirps = np.exp(-((TIME[:, None] - np.array(middles)) / half_length_s) ** 4).sum(1)
    return gain_of(chirp_db) * (between_gain + chirps) * noise(chirp_colour, 0.011)


def scene():
    """Water in front, cricket and air behind."""
    return water() + cricket() + background()


def record(dry, edge_hz=16200):
    """The microphone lifts the treble near 7.5 kHz and dulls what lies above; then a steep low-pass."""
    # microphone response: [f/Hz, level/dB]
    mic_colour = [(30, -12.5), (250, -10), (450, -2), (900, -3.5), (1600, -0.5), (1900, 0), (2300, 2),
                  (3300, 5), (4800, 3.5), (7500, 12.5), (8500, -3), (9800, -6.5), (12500, -7), (15000, -2),
                  (16500, -28)]
    heard = np.array([coloured(channel, mic_colour) for channel in dry])
    low_pass = signal.firwin(511, edge_hz, window=("kaiser", 9), fs=SR)
    return signal.oaconvolve(heard, low_pass[None], "same")


dry = scene()
out = record(dry)
int16_out(out)
```